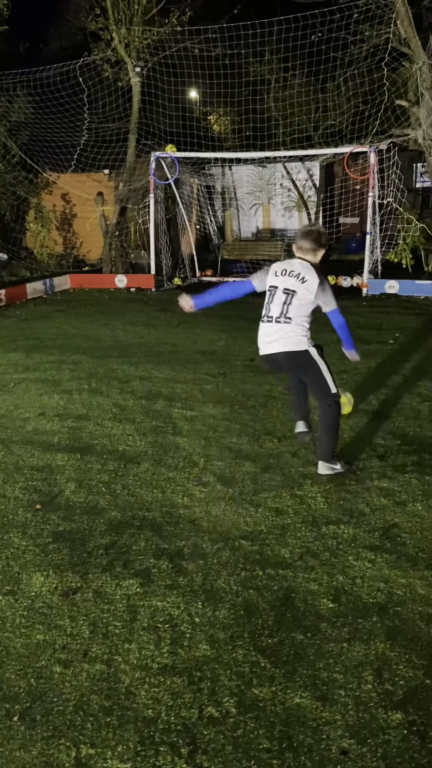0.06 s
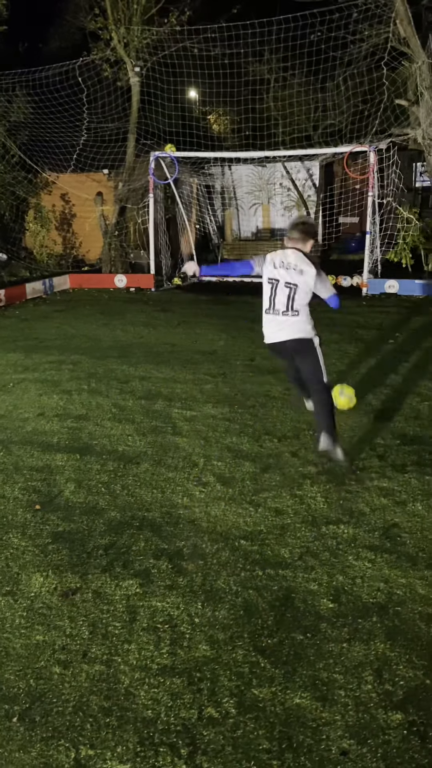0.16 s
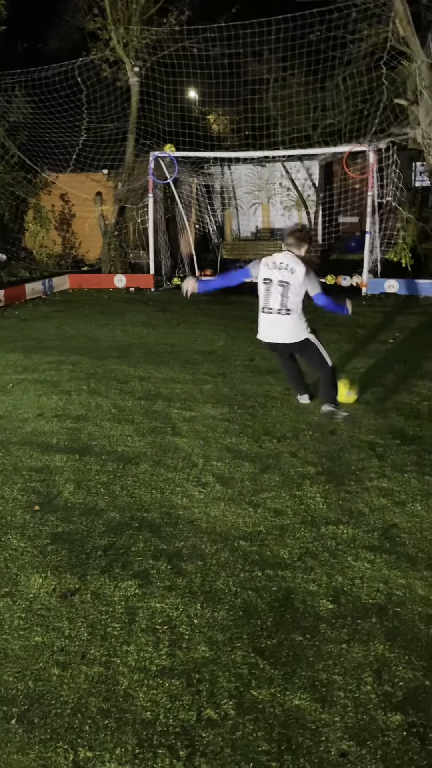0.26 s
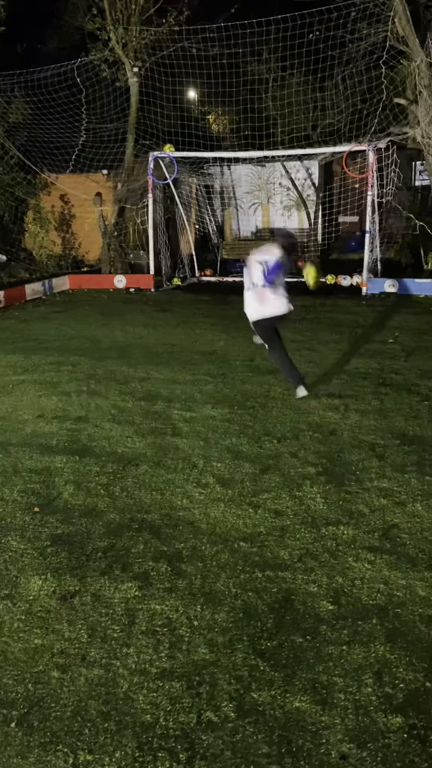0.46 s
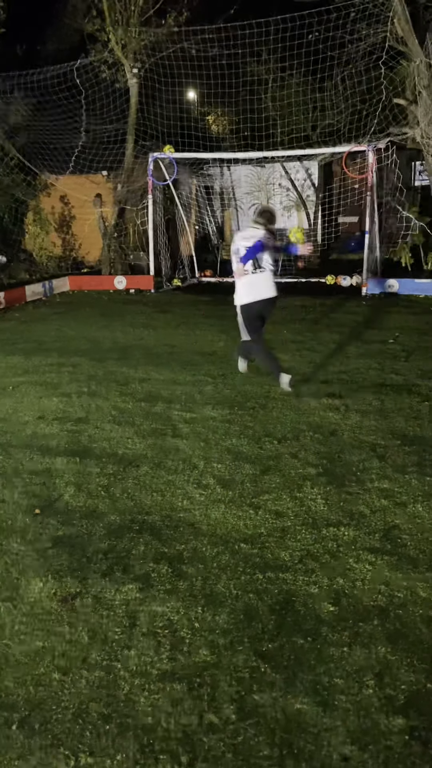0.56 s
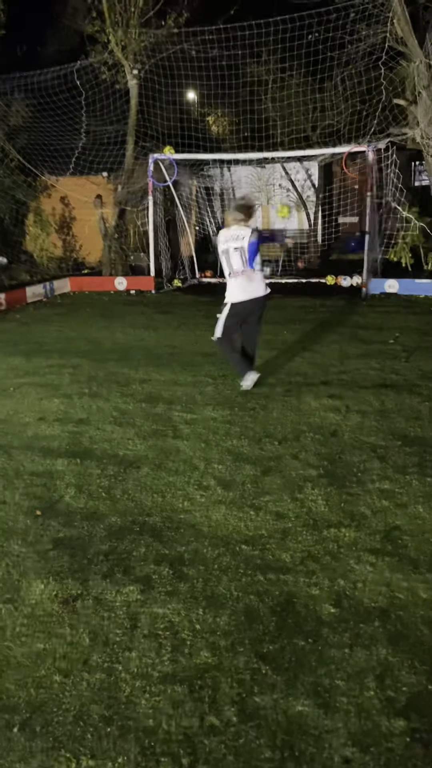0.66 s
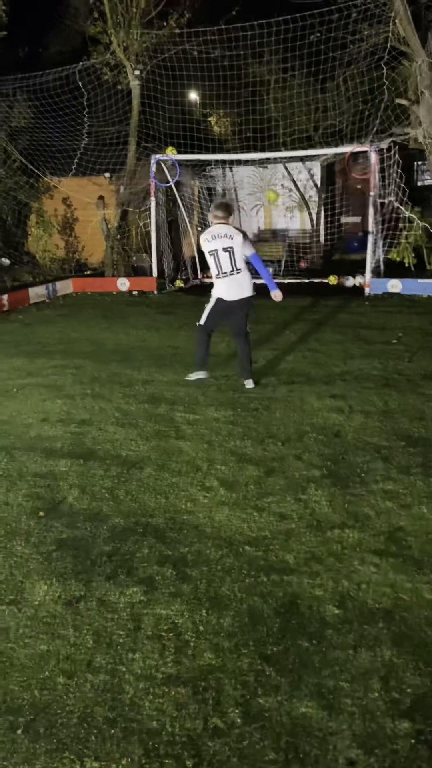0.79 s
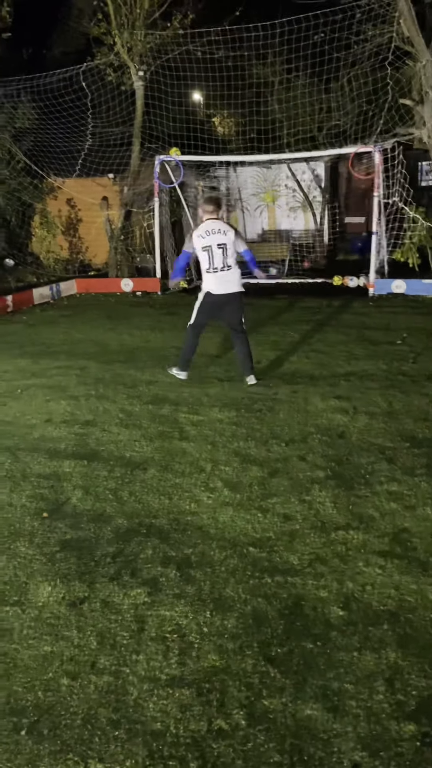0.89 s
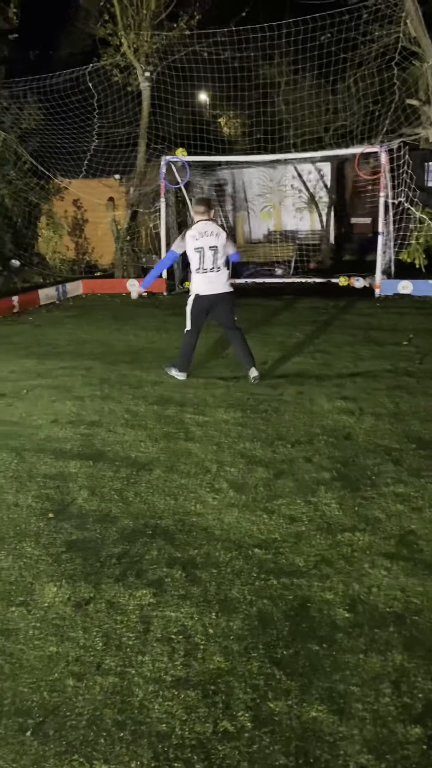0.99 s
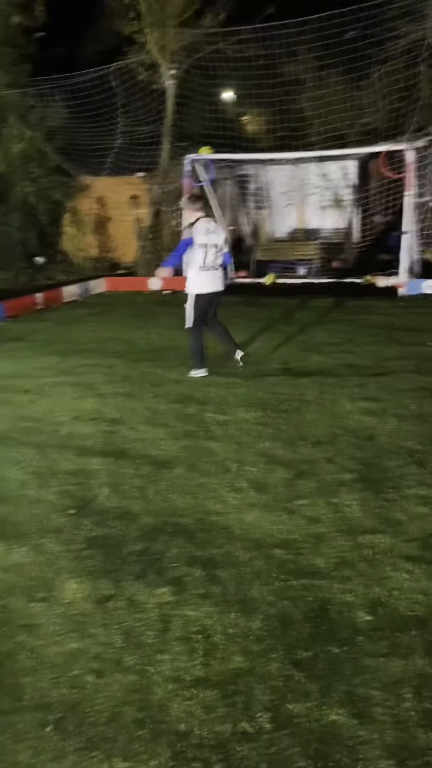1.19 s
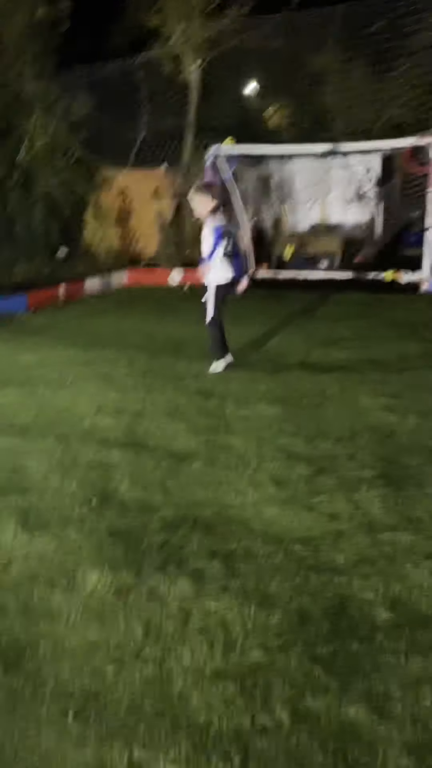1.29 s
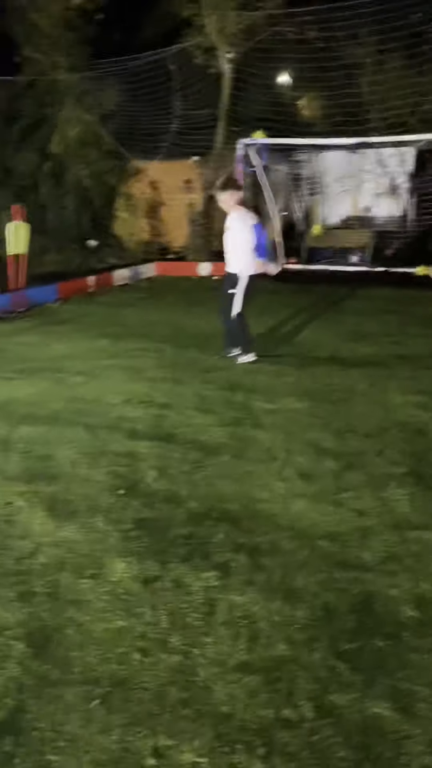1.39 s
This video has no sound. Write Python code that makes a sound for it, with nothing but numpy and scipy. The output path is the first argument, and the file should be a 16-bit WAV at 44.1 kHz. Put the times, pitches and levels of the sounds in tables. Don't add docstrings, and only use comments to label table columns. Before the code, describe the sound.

One sharp boot strike on a football outdoors, dull echo, soft net swish and a low bounce

```python
import sys
import numpy as np
from scipy import signal
from scipy.fft import rfft, irfft
from scipy.io import wavfile
from scipy.ndimage import uniform_filter1d

SR = 44100
rng = np.random.default_rng(int(sys.argv[2]) if len(sys.argv) > 2 else 0)


def output_pcm(signal):
    pcm = np.clip(np.atleast_2d(signal).T, -1, 1) * 32767
    wavfile.write(sys.argv[1], SR, np.round(pcm).astype(np.int16))


def field_ratio(decibels):
    return 10 ** (np.asarray(decibels, dtype=float) / 20)


N = 63945
SIZE = 2 ** 16
HZ = np.maximum(np.arange(SIZE // 2 + 1) * SR / SIZE, 1)

# start [s], crack level [dB], crack length [s], thump level [dB], tail level [dB].
IMPACTS = [
    (.2424, -26, .0007, -7, -39),
    (.5555, -45, .003, -37, -55),
    (.2543, -44, .001, -50, -60),
    (1.1352, -34, .003, -19, -43),
    (1.1452, -43, .001, -50, -60),
    (1.423, -75, .004, -38, -52),
    (.7895, -43, .002, -60, -70),
]
# start [s], level [dB].
WALL_RETURNS = [(0.278, -18.5), (0.299, -45), (0.316, -34.5), (0.337, -34), (0.361, -33.5), (0.459, -49),
                (1.159, -26), (1.184, -29.5), (1.222, -33), (1.259, -43), (1.284, -66), (1.343, -51)]
# start [s], attack [s], hold [s], t60 [s], level [dB].
TURF_BRUSHES = [
    (.207, 0.0064, .028, 0.045, -34.5),
    (.245, .002, 0.013, 0.46, -44),
    (.545, 0.013, 0.038, 0.27, -55),
    (1.136, 0.0015, 0.008, 0.43, -45.5),
]
# start [s], attack [s], hold [s], t60 [s], level [dB].
SWISHES = [
    (.207, 0.0063, 0.039, .02, -43.5),
    (.12, 0.021, 0.021, 0.15, -61.5),
    (0.788, .03, 0.071, 0.93, -50),
    (0.6, .001, 0.0027, 0.026, -61),
    (.968, 0.0036, 0.0051, 0.018, -60),
    (1.14, 0.0025, 0.0086, 0.28, -55.5),
]
# start [s], attack [s], hold [s], t60 [s], level [dB].
CORD_SNAPS = [
    (.835, .012, .01, .15, -55),
    (.2145, .001, .003, .03, -38),
    (.7885, .0006, .008, .2, -46),
    (1.14, .003, .03, .22, -51),
]
# start [s], attack [s], hold [s], t60 [s], level [dB].
RATTLES = [
    (1.259, .003, .01, .05, -57),
    (1.283, .004, .014, .08, -60),
    (1.047, .003, .006, .05, -62),
]
# start [s], attack [s], hold [s], t60 [s], level [dB].
FLIGHT = [
    (.63, 0.049, 0.12, 0.044, -66),
]
# start [s], level [dB].
FOOTFALLS = [(.0, -48.5), (0.043, -46.5), (.145, -40.5), (0.293, -34), (0.398, -41.5), (.565, -33),
             (0.592, -37.5), (0.967, -55), (1.278, -55)]
# time [s], level [dB].
BREEZE_LEVEL = [(0, -69.5), (.15, -64), (.45, -72), (.6, -58.5), (.66, -105), (.77, -87), (.82, -53.5),
                (1.1, -76), (1.2, -63), (1.45, -63)]
# start [s], frequency [Hz], level [dB], hold [s], t60 [s].
PANEL_MODES = [(.29, 85, -35, 0.033, 0.086), (.322, 141.3, -35, 0.039, 0.053),
               (.312, 215, -35, 0.0081, 0.041), (.39, 75, -44, 0.043, 0.19),
               (.455, 110, -43.5, 0.011, 0.042), (1.2, 121, -41.5, 0.026, 0.7),
               (1.345, 138, -49, 0.037, 0.15), (1.418, 117, -36.5, .03, .3),
               (1.177, 133, -26.5, 0.0102, 0.034)]
# start [s], frequency [Hz], level [dB], t60 [s].
TICK_MODES = [(.2540, 3200, -33, .007), (.2115, 4500, -37, .005), (.2153, 1100, -30, .01),
              (.2158, 2600, -33, .006), (.2130, 6200, -36, .005), (.2190, 5000, -35, .005),
              (.2225, 1600, -34, .008), (.2305, 6000, -34, .007), (.2335, 3800, -36, .005),
              (.2370, 2200, -37, .006), (.2170, 9000, -36, .006), (.2200, 11500, -38, .005),
              (.2250, 4200, -37, .005), (.2310, 12500, -38, .006), (.2465, 4200, -32, .008),
              (1.1348, 2650, -31, .012), (1.1345, 5110, -35, .01), (1.1362, 6140, -34, .009),
              (1.1352, 10300, -39, .01), (1.1364, 3290, -34, .012), (1.1450, 1750, -30, .009),
              (1.1400, 2800, -37, .01), (1.1365, 5300, -38, .008), (.7895, 2080, -41, .015),
              (.7897, 3400, -46, .01), (.7900, 1500, -43, .015), (.8205, 1500, -43, .02),
              (.9687, 1990, -48, .012), (1.2620, 3100, -47, .03), (1.2660, 4350, -50, .025),
              (1.2900, 2700, -51, .02)]
# start [s], frequency [Hz], level [dB], t60 [s].
SKIN_MODES = [(.2423, 3750, -8, .006), (.2425, 2400, -10, .006), (.2426, 1580, -17, .006),
              (.2424, 4750, -13, .005), (.2426, 2950, -15, .005), (.2425, 5400, -20, .004),
              (.2423, 6330, -21, .006), (.2422, 8700, -21, .004), (.2422, 11300, -27, .004),
              (.2422, 13000, -20, .003)]

# frequency [Hz], level [dB].
KICK_CRACK_COLOUR = [(300, -18), (700, -4), (1200, -2), (2000, -8), (3900, -6), (5500, 6), (9000, 14),
                     (16000, -5)]
SLAP_COLOUR = [(400, -23), (750, 3), (1700, 3), (2800, 0), (3900, -15), (5600, 0.5), (10000, -10),
               (16000, -10)]
KICK_THUMP_COLOUR = [(35, -24), (60, -4), (95, 4.5), (140, -1), (220, -10), (400, -24), (900, -25.5),
                     (1350, -39.5)]
BOUNCE_COLOUR = [(40, -27), (70, -7), (120, -1.5), (170, -4), (250, -11), (400, -26.5), (900, -30.5)]
RETURN_COLOUR = [(45, -22), (80, -7), (125, 2), (170, -10.5), (260, -14.5), (500, -32.5)]
TURF_COLOUR = [(80, -31), (250, 4), (900, -2), (2400, -12), (6000, -16), (9000, -19), (12000, -23.5),
               (16000, -24)]
NET_COLOUR = [(200, 5), (500, -7.5), (1500, -1.5), (2700, -1.5), (5700, -8), (9000, -14), (12000, -20),
              (16000, -29)]
SNAP_COLOUR = [(400, 2), (1000, -13), (1550, 4.5), (1900, -7), (2300, 2.5), (3200, -11.5), (4500, -19),
               (6000, -17.5)]
FITTING_COLOUR = [(1800, -3), (2600, -3), (3100, -3), (3600, -7.5), (4300, -9), (5200, -18)]
FLIGHT_COLOUR = [(1200, -36), (2000, -3.5), (3000, -21), (3900, 1.5), (5000, -13), (6500, -51)]
STEP_COLOUR = [(30, -57), (50, 12.5), (70, 1), (100, -12.5), (200, -7.5), (400, -20)]
LEAF_COLOUR = [(1500, 5.5), (4000, -3.5), (6000, -3), (10000, -7.5), (13000, -3.5), (16500, -9)]
TRAFFIC_COLOUR = [(25, -22), (55, -1), (100, -3.5), (250, -12), (900, -14), (1600, -24.5), (4000, -37),
                  (16000, -62)]

# frequency [Hz], likeness [0 to 1].
CHANNEL_LIKENESS = [(100, .995), (340, .85), (700, .3), (2000, .7), (4000, .5), (6000, .65), (6900, .995),
                    (8100, .99), (9000, .7), (9800, .995), (10800, .995), (11700, .7), (12600, .995),
                    (14600, .99), (15600, .7)]
# frequency [Hz], phase [rad].
RIGHT_PORT_PHASE = [(300, 0), (800, -.7), (1400, .3), (2900, -1.4), (5000, -.8), (6800, -3.14),
                    (8200, -3.14), (9700, -6.28), (11000, -6.28), (12500, -9.42), (14600, -9.42),
                    (15800, -12.5)]
# frequency [Hz], level difference [dB].
LEFT_OVER_RIGHT = [(40, -0.7), (150, -1.46), (400, -3.5), (900, 2), (2000, -1.5), (4000, 0.5), (6500, 3.5)]


def at_hz(points):
    hz, value = np.transpose(points)
    return np.interp(np.log(HZ), np.log(hz), value)


def shaped(x, response):
    return irfft(rfft(x, SIZE) * response, SIZE)[..., :N]


def colour(points):
    low_end = np.minimum(1, HZ / points[0][0]) ** 4
    high_end = np.minimum(1, points[-1][0] / HZ) ** 8
    gain = field_ratio(at_hz(points)) * low_end * high_end
    return gain / np.sqrt(np.mean(gain ** 2))


def swell(rows):
    t, out = np.arange(N) / SR, np.zeros(N)
    for start, attack, hold, t60, db in rows:
        rise = np.clip((t - start) / attack, 0, 1)
        release_age = np.clip(t - start - attack - hold, 0, None)
        out += rise * field_ratio(db - 60 * release_age / t60)
    return out


def hiss(points, envelope, grain_db, grain_s):
    lumps = uniform_filter1d(rng.standard_normal(N), max(int(grain_s * SR), 1))
    grain = field_ratio(grain_db * lumps / lumps.std())
    first, second = rng.standard_normal((2, N)) * envelope * grain
    alike = np.clip(at_hz(CHANNEL_LIKENESS), 0, 1)
    gain = colour(points)
    left = shaped(first, gain)
    right = shaped(first, gain * alike) + shaped(second, gain * np.sqrt(1 - alike ** 2))
    return np.array([left, right])


def pushes(rows, points, lift_db):
    clicks, gain = np.zeros(N), colour(points)
    for start, db in rows:
        clicks[int(start * SR)] += field_ratio(db + lift_db)
    return shaped(clicks, gain / gain.mean())


def struck_modes(rows):
    out, age = np.zeros(N), np.arange(SR // 20) / SR
    for s, hz, db, t60 in rows:
        start = int(s * SR)
        out[start:start + len(age)] += field_ratio(db - 60 * age / t60) * np.sin(2 * np.pi * hz * age)
    return out


def traffic():
    return hiss(TRAFFIC_COLOUR, field_ratio(-53.5), grain_db=.8, grain_s=.04)


def leaves():
    breeze = field_ratio(np.interp(np.arange(N) / SR, *np.transpose(BREEZE_LEVEL)))
    return hiss(LEAF_COLOUR, breeze, grain_db=1.1, grain_s=0.015)


def panels():
    t, out = np.arange(N) / SR, np.zeros(N)
    for start, hz, db, hold, t60 in PANEL_MODES:
        envelope = swell([(start, 1 / hz, hold, t60, db)])
        out += envelope * np.sin(2 * np.pi * hz * (t - start))
    return out


def rattle():
    return hiss(FITTING_COLOUR, swell(RATTLES), grain_db=5.0, grain_s=0.0016)


def wall_returns():
    return pushes(WALL_RETURNS, RETURN_COLOUR, lift_db=0.5)


def rumble_tail():
    rows = [(start + 0.0056, .02, 0, 0.79, tail_db) for start, _, _, _, tail_db in IMPACTS]
    return hiss(RETURN_COLOUR, swell(rows), grain_db=-1.5, grain_s=0.016)


def footfalls():
    return pushes(FOOTFALLS, STEP_COLOUR, lift_db=2.5)


def whistle():
    return hiss(FLIGHT_COLOUR, swell(FLIGHT), grain_db=2.0, grain_s=0.0034)


def swish():
    return hiss(NET_COLOUR, swell(SWISHES), grain_db=2.0, grain_s=0.011)


def cord_snaps():
    return hiss(SNAP_COLOUR, swell(CORD_SNAPS), grain_db=2.0, grain_s=.002)


def turf_brush():
    return hiss(TURF_COLOUR, swell(TURF_BRUSHES), grain_db=4.5, grain_s=0.00075)


def crack(hits, points):
    burst = swell([(start - length / 3, length / 2, 0, 5 * length, db) for start, db, length, _, _ in hits])
    first, second = rng.standard_normal((2, N)) * burst
    return shaped(np.array([first, .99 * first + .14 * second]), colour(points))


def thump(hits, points):
    return pushes([(start, db) for start, _, _, db, _ in hits], points, lift_db=6)


def bounces():
    return crack(IMPACTS[1:], SLAP_COLOUR) + thump(IMPACTS[1:], BOUNCE_COLOUR)


def kick():
    strike = crack(IMPACTS[:1], KICK_CRACK_COLOUR) + thump(IMPACTS[:1], KICK_THUMP_COLOUR)
    return strike + struck_modes(SKIN_MODES)


def scene():
    night = traffic() + leaves()
    surroundings = panels() + rattle() + wall_returns() + rumble_tail()
    player_and_net = footfalls() + whistle() + swish() + cord_snaps() + struck_modes(TICK_MODES)
    return night + surroundings + player_and_net + turf_brush() + bounces() + kick()


def low_pass(x):
    return signal.sosfilt(signal.butter(12, 17320, fs=SR, output="sos"), x)


def record(dry):
    lag_s = .0215 * (100 / np.hypot(HZ, 60)) ** 1.5
    late = np.exp(1j * 3.0 - 2j * np.pi * np.cumsum(lag_s) * SR / SIZE)
    hz, phase = np.transpose(RIGHT_PORT_PHASE)
    tilt = field_ratio(at_hz(LEFT_OVER_RIGHT) / 2)
    ports = np.array([tilt, np.exp(1j * np.interp(HZ, hz, phase)) / tilt])
    top = np.where(HZ < 15900, 1, field_ratio(-30))
    return low_pass(shaped(dry, late * ports * top))


dry = scene()
out = record(dry)
output_pcm(out)
```